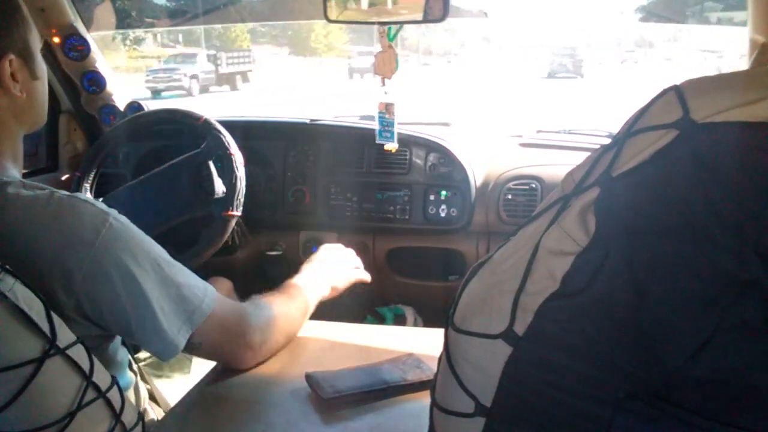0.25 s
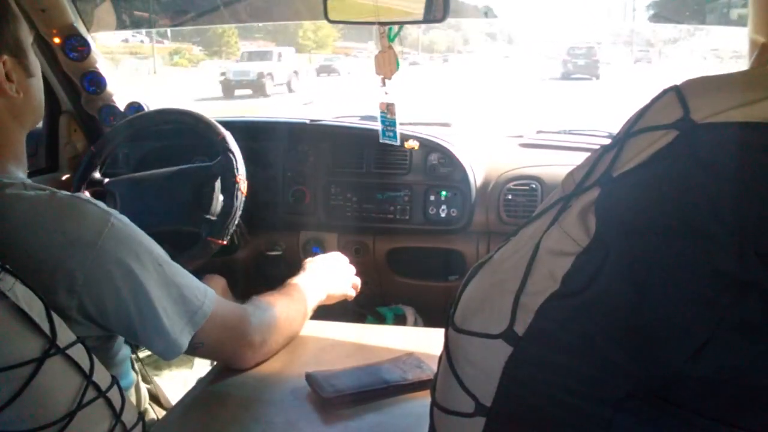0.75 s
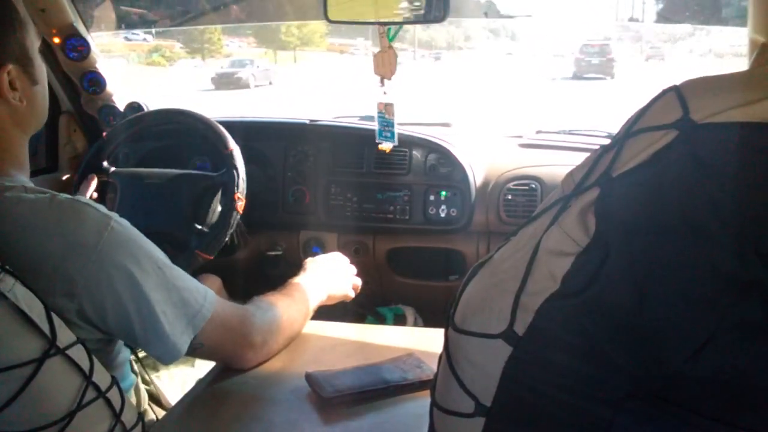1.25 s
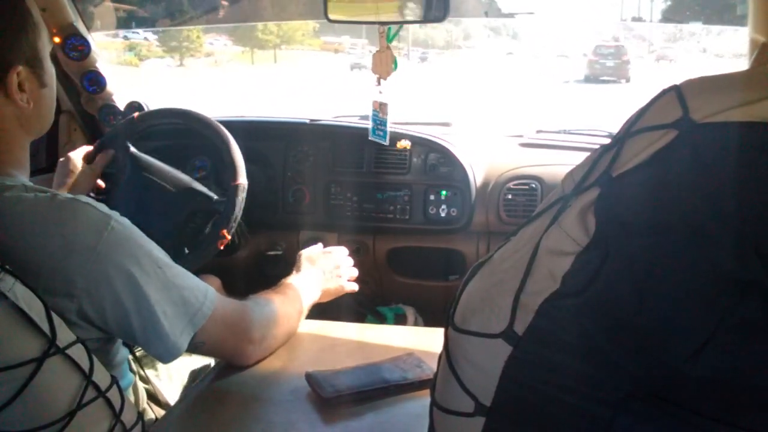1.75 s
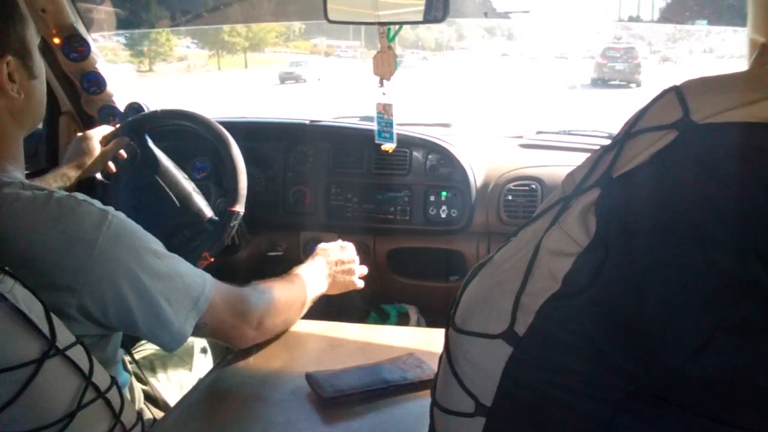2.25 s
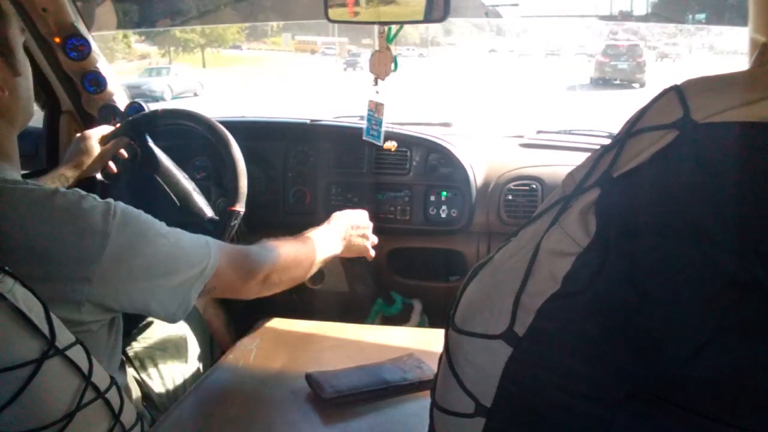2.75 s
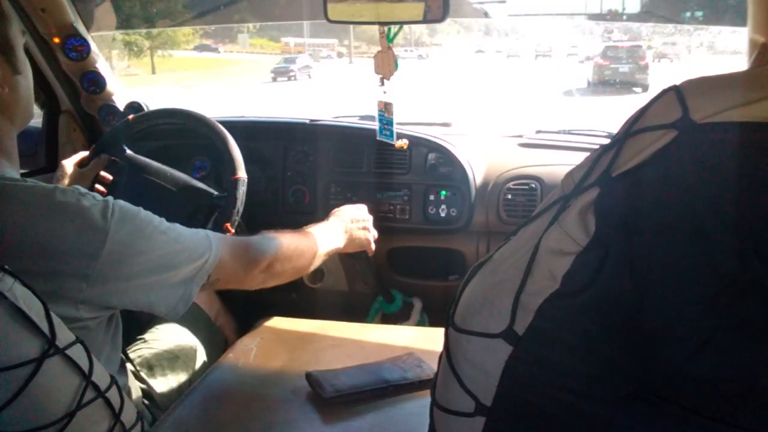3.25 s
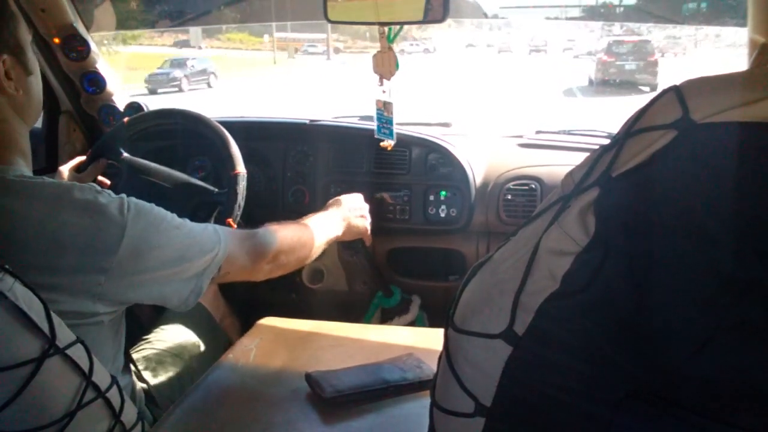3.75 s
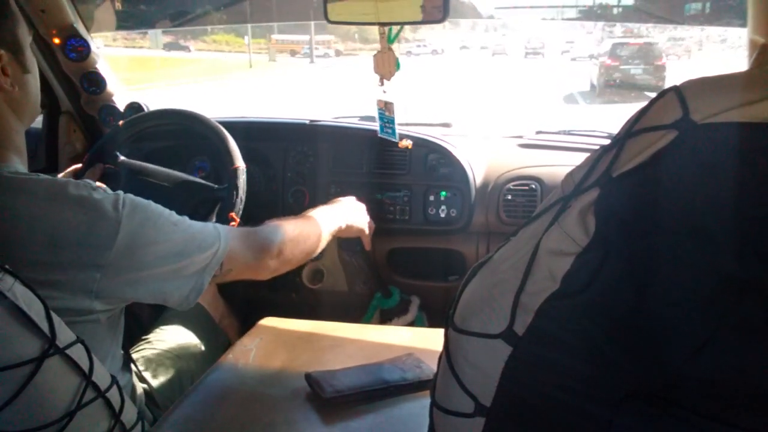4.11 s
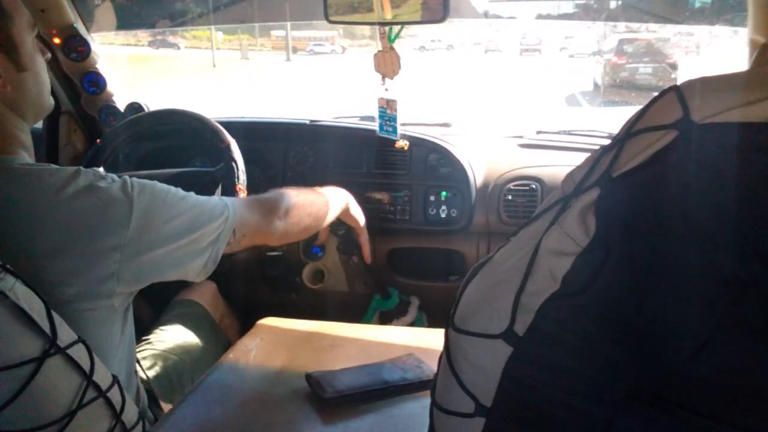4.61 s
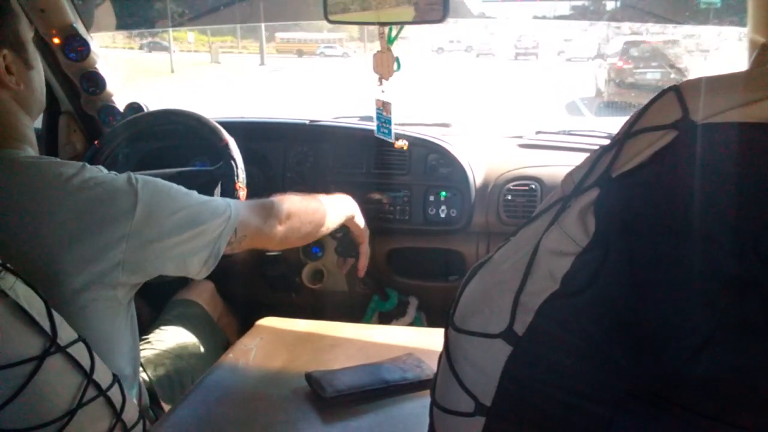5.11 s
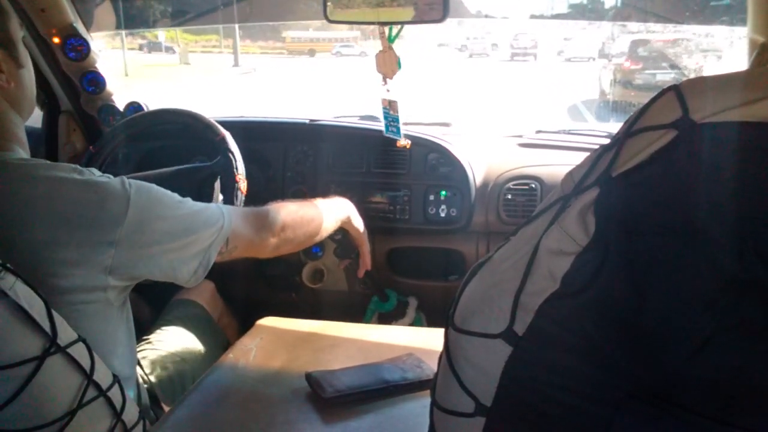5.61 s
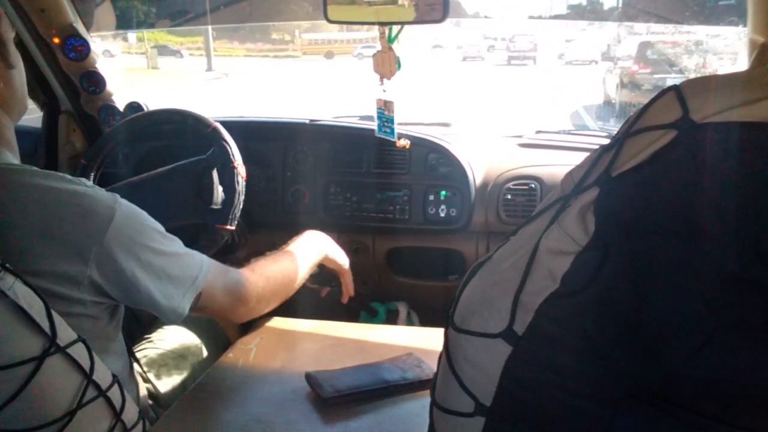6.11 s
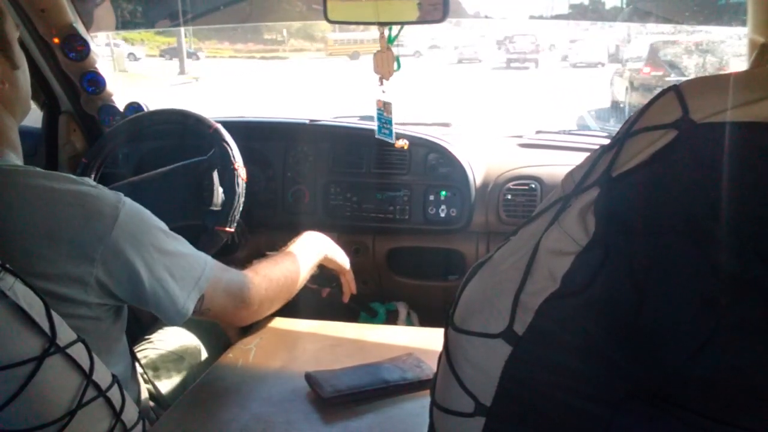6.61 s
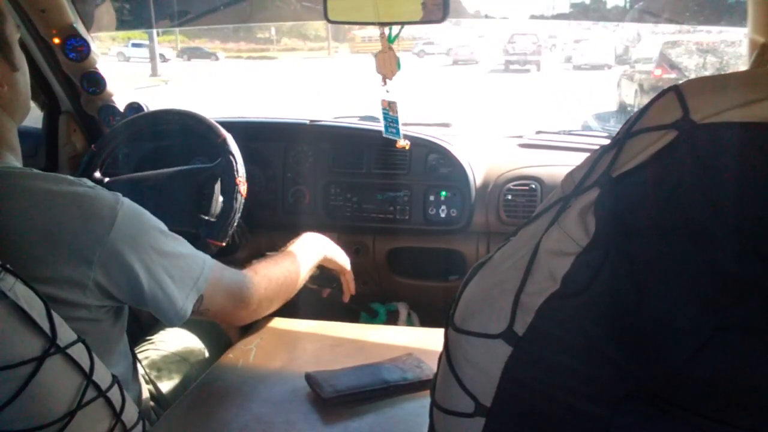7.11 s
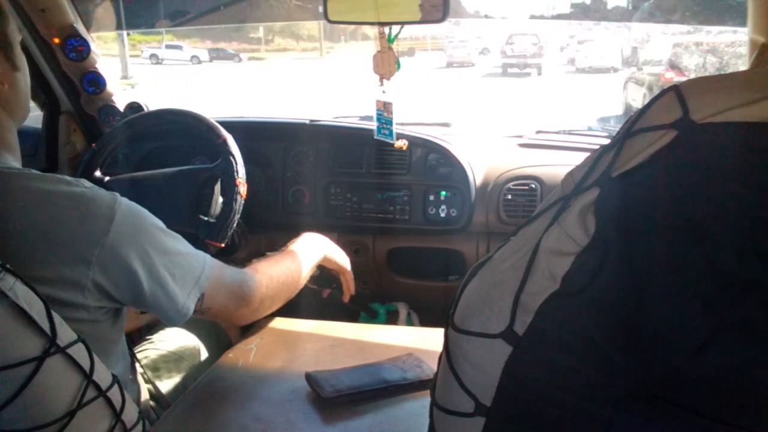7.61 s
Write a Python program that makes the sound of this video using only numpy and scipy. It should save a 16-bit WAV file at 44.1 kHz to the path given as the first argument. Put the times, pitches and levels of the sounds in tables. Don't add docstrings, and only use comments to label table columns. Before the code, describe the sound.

From 0 s, a moving diesel pickup cab is filled with bassy road roar, slight hiss and a throbbing tyre hum around 125 Hz, roughened by coarse patches and jolts. Engine tones and faint gear rattle sit beneath. A soft pedal rub swells from 0.2 to 0.6 s; dull trim knocks and light plastic ticks scatter until about 2.3 s, the strongest knock near 0.9. At 1.5 s the pedal slips with a loud, stuttering snap. A gentle press follows, with a thin, dry squeak from 2.15 to 2.67 s, strongest near 2.55. The engine then drops in pitch, reaching a steady clattering idle by 3.5 s; a sleeve slides near 2.8 and a last knock lands at 3.3. Tiny snaps come around 4.6 to 4.9 s. Keys and cloth rustle faintly until 7.3. The hum keeps gliding down below 50 Hz and the roar weakens, leaving idle clatter clearer at 7.86 s.

```python
import sys
import numpy as np
from scipy import signal
from scipy.fft import rfft, irfft
from scipy.io import wavfile
from scipy.ndimage import uniform_filter1d

SR = 44100
rng = np.random.default_rng(int(sys.argv[2]) if len(sys.argv) > 2 else 0)


def materialize(psi):
    bounded = np.clip(np.atleast_2d(psi).T, -1, 1)
    quanta = np.round(bounded * 32767).astype(np.int16)
    wavfile.write(sys.argv[1], SR, quanta)


def ratio(d):
    e = np.asarray(d, float) / 20
    return 10 ** e


N = 346626

# [t/s, tread pitch f/Hz]
SPEED = [(0, 127.5), (.6, 127.5), (1, 124.5), (1.6, 121), (2.8, 115.5), (3.3, 110), (3.9, 104), (4.7, 95),
         (5, 91), (5.25, 86), (5.6, 76.5), (5.95, 73.5), (6.4, 64.5), (6.85, 60), (7.45, 52), (7.86, 48.3)]
# [t/s, length/s, level/dB]
PATCHES = [(0.046, 0.15, 6.5), (0.261, 0.034, 11.5), (0.612, 0.16, 7.5), (0.891, .08, 11.5),
           (1.08, 0.044, 12), (1.287, .05, 4), (1.565, 0.16, 8), (1.894, 0.11, 7), (2.06, 0.055, 5),
           (0.432, .05, 1.5), (1.397, .06, 0.5), (4.503, .06, 1.5), (6.7, .05, 1), (2.252, 0.21, 5.5),
           (2.561, 0.079, 7.5), (2.766, 0.036, 13.5), (2.93, .07, 3), (3.282, .06, 3.5), (3.931, 0.11, 9),
           (4.278, 0.12, 7.5), (4.72, 0.074, 9), (4.983, 0.1, 4.5), (5.21, 0.1, 8.5), (5.629, 0.082, 10.5),
           (5.939, 0.13, 11), (6.474, 0.13, 7.5), (6.857, 0.16, 5), (7.408, 0.028, 12.5)]
# [t/s, level/dB]
JOLTS = [(0.219, 6.5), (.36, 6), (.52, 7), (1.2, 2), (2.32, 2), (2.761, 3), (3.26, 4), (4.24, 7),
         (4.7, 2.5), (4.99, 5), (5.5, 1), (5.91, -2), (6.06, 1), (6.42, -1), (6.85, 2), (7.14, 3),
         (7.35, 2)]
# [f/Hz, level/dB per Hz]
ROAR = [(24, -37), (40, -35), (65, -3.5), (91, 1), (209, -4.5), (377, -9.5), (449, -14), (912, -20),
        (1230, -21.5), (1750, -32.5), (2170, -34), (2800, -42.5), (3610, -45.5), (4400, -55), (5720, -87),
        (9680, -120)]
# [f/Hz, level/dB per Hz]
HISS = [(4700, -52.5), (5200, -55), (5500, -58.5), (8600, -59), (9100, -67), (13000, -65.5), (13600, -59.5),
        (15800, -52.5)]
# [f/Hz, likeness -1 to 1]
LIKENESS = [(60, 0.76), (99, 0.96), (160, 0.83), (270, 0.72), (450, 0.86), (740, 0.073), (1220, -0.62),
            (2010, 0.22), (3330, -0.13), (5500, -0.071), (9080, -0.04), (15000, -0.5)]
# [f/Hz, left minus right level/dB]
LEAN = [(60, -1), (180, -2.5), (550, -5.5), (1650, -1.5), (4970, -1.5), (15000, 2.5)]
# [multiple of tread pitch, level/dB at full speed]
TREAD_TOP = [(3, -36.5), (4, -38.5), (5, -44)]
# [f/Hz, level/dB]
BOOM = [(50, 3.5), (80, -7), (97, 3.5), (110, 0), (120, 5), (150, 0.5), (200, -2.5), (240, -4.5)]

# [t/s, firings per second f/Hz, share in gear 0-1]
ENGINE = [
    (0, 57.6, 1),
    (1.2, 55.4, 1),
    (2.4, 53, 1),
    (2.7, 47, .5),
    (3.1, 38.5, 0),
    (3.5, 37.25, 0),
    (7.86, 37.25, 0),
]
# [crank order in thirds of the firing rate, level/dB in gear, level/dB at idle]
ORDERS = [(3, -30, -50), (6, -42, -39), (9, -36, -45), (12, -38, -43), (15, -48, -42), (16, -55, -40),
          (18, -46, -39), (21, -48, -44), (24, -48, -36.5), (27, -50, -45), (33, -52, -48),
          (36, -52, -42.5)]
# [f/Hz, width/Hz, level/dB]
BLOCK = [(500, 133, -41.5), (730, 540, -53.5), (1210, 360, -48.5), (2020, 200, -60.5), (4940, 130, -85)]
# [f/Hz, width/Hz, level/dB in gear]
GEARBOX = [(1410, 120, -52), (2980, 390, -58), (3800, 370, -70.5)]
# [f/Hz, width/Hz, level/dB at idle]
INJECTOR = [(1890, 94, -56), (3350, 250, -71), (3540, 58, -67)]

# [t/s, level/dB]
RUSTLES = [(.908, -48), (1.118, -50.5), (1.225, -54), (1.278, -48), (1.3605, -51), (1.807, -50),
           (2.1126, -46.5), (3.5, -47), (3.908, -53), (4.0228, -51), (4.413, -51), (4.7968, -50),
           (4.836, -52), (4.869, -49), (5.295, -47.5), (5.3294, -43.5), (5.4087, -51), (5.4796, -52),
           (5.6325, -52), (5.7648, -45), (5.815, -46), (6.045, -51), (6.144, -48), (6.3619, -54),
           (6.5565, -48), (6.6233, -50.5), (6.71, -52), (6.793, -52), (6.854, -45), (7.1535, -50),
           (0.077, -49), (.735, -46.5), (1.066, -49), (1.383, -47), (1.7486, -60), (1.988, -45.5),
        (3.214, -49), (3.794, -49), (3.954, -44.5), (4.3594, -51), (4.765, -46), (5.235, -47.5),
        (5.355, -49), (5.385, -49), (5.6955, -55), (6.0, -56), (6.2034, -47), (6.9082, -47), (7.206, -48),
        (7.3407, -54)]
# [t/s, level/dB, length/s, left minus right level/dB]
SLEEVE = [
    (2.722, -54.5, 0.23, -5),
    (2.881, -56, 0.31, -3),
]
# [f/Hz, level/dB per Hz]
CLOTH = [(2500, 7.5), (4500, 4), (6000, -2.5), (8600, 2), (9200, -6.5), (13000, -5), (13700, 3),
         (15800, -11)]
# [t/s, level/dB, f/Hz, upper ring level/dB, left minus right level/dB]
KNOCKS = [
    (.161, -32, 530, -8, -3.5),
    (.507, -30, 560, -8, -5),
    (.666, -30, 665, -8, -2.5),
    (0.904, -24, 520, -8, -5),
    (1.16, -27, 525, -7, -9),
    (1.314, -25.5, 560, -3, -7),
    (1.322, -33, 560, -8, -7),
    (1.87, -30.5, 624, -3, -3),
    (3.271, -29, 696.7, -6, -3),
]
# [t/s, level/dB, f/Hz, upper ring level/dB, left minus right level/dB]
TICKS = [(0.5814, -36, 2400, -16, 8), (0.6051, -39, 2400, -18, -5), (0.6432, -40.5, 2520, -4, -5),
         (0.956, -32, 2460, -10, 2), (0.9618, -32, 2401, -20, -7), (1.092, -33, 2400, -14, -3),
         (1.1147, -40, 2470, -7, 4), (1.236, -41, 2440, -20, -6), (1.3898, -36.5, 2455, -13, 1),
         (1.7684, -33.5, 2370, -15, 3), (1.8163, -47, 2334, -21.5, 0), (2.059, -35, 2430, -19, 1),
         (2.1001, -39, 2420, -11, -6), (2.2423, -44, 2400, -10, 2), (2.275, -38, 2420, -18, -3),
         (2.8167, -38, 2050, -7, 3), (3.1946, -41, 2250, -15, 7), (4.657, -41, 2000, -16, -5),
         (5.0653, -41, 2390, -16, 6)]
# [t/s, level/dB, f/Hz, upper ring level/dB, left minus right level/dB]
SNAPS = [
    (4.6424, -49, 3000, -20, 6),
    (4.655, -48, 3350, -22, 6),
    (4.665, -49, 3300, -20, 6),
    (4.88, -40.5, 4320, -15, 9),
    (4.8805, -47, 2400, -5, 6),
    (1.5168, -28, 4900, -9, -1),
]

# [t/s, rise/s, hold/s, fall/s, level/dB]
STROKES = [
    [(0.16, 0.293, 0.082, 0.078, -40)],
    [(1.503, 0.0059, 0.0086, 0.014, -28), (1.51, 0.013, .035, .045, -33.5)],
    [(2.13, 0.073, 0.38, 0.055, -55.5), (2.38, 0.22, 0.06, 0.028, -48)],
]
# [f/Hz, level/dB per Hz]
RUBS = [
    [(760, -34.5), (1300, -17.5), (1600, 2), (2100, -3.5), (2760, 1.5), (3440, -4.5), (4060, -5),
     (4900, -8), (5400, -14), (6040, -12.5), (8350, -11.5), (10300, -24), (12800, -13), (15800, -17.5)],
    [(1100, -43), (1400, -3.5), (2300, -5), (2800, -4), (3100, -10.5), (5000, -13), (5600, -17),
     (8300, -15), (9500, -24.5), (13000, -22.5), (15800, -18)],
    [(1060, -41), (1800, 2), (2360, -8), (2450, -11), (3160, -2.5), (3460, -11.5), (3860, -10), (5030, -16),
     (6140, -6), (6910, -17), (8340, -7.5), (9160, -24), (11000, -18.5), (12400, -16), (13300, -27),
     (15800, -23)],
]
# [f/Hz, width/Hz, level/dB]
PEDAL_ARM = [(1580, 50, -12), (2200, 50, -14), (2830, 60, -8), (3200, 45, -10), (3910, 70, 2),
             (4180, 55, 1), (4500, 70, -2), (4790, 70, 5), (5100, 60, -6)]
# [t/s, level/dB, f/Hz, length/s]
SLIPS = [
    (1.5068, -13, 1640, .003),
    (1.5142, -13.5, 1600, .0026),
    (1.521, -21, 2250, .003),
    (1.5305, -25, 1600, .003),
    (1.5395, -16, 1620, .0045),
    (1.5582, -18, 1640, .003),
    (1.5665, -26, 1700, .004),
    (1.574, -28, 1620, .004),
]
# [t/s, level/dB]
PRESSURE = [
    (2.15, -12),
    (2.32, -6),
    (2.41, -5),
    (2.46, 0),
    (2.51, 2),
    (2.56, 4.5),
    (2.6, -5),
    (2.67, -6),
]
# [t/s, slips per second f/Hz]
SLIP_RATE = [
    (2.17, 388),
    (2.27, 385),
    (2.35, 388),
    (2.4, 385),
    (2.47, 388.5),
    (2.515, 380),
    (2.54, 382.5),
    (2.58, 387.5),
    (2.67, 389),
]
# [multiple of the slip rate, level/dB]
SQUEAK_TONES = [(2, 6), (4, 10), (5, 2), (6, -4), (7, -10), (8, 6), (9, 0), (10, -1), (11, -7), (12, -2),
                (13, -13), (14, -6), (15, -10), (16, -8), (17, -17), (18, -15), (19, -14), (20, -11),
                (21, -12), (22, -12), (24, -22), (25, -22), (28, -26), (30, -24), (31, -24), (32, -17.5)]
# [start t/s, end t/s, f/Hz, level/dB]
WHISTLES = [(1.95, 2.06, 5200, -72), (1.96, 2.12, 5900, -67), (2.03, 2.11, 9200, -71.5),
            (1.98, 2.1, 8000, -74), (2.0, 2.09, 9100, -73), (2.49, 2.6, 2100, -52), (2.49, 2.58, 2290, -57),
            (2.57, 2.67, 3712, -53), (2.55, 2.67, 6200, -58), (2.57, 2.67, 6340, -59),
            (2.57, 2.67, 1800, -49), (2.5, 2.58, 4190, -58), (2.59, 2.67, 3300, -61)]


def evened(x):
    return x / np.sqrt(np.mean(x ** 2) + 1e-20)


def read(points, hz):
    f, value = np.transpose(points)
    return np.interp(np.log(hz + 1), np.log(f + 1), value)


def columns(rows, t):
    s, *cols = np.transpose(rows)
    return [np.interp(t, s, c) for c in cols]


def add(mix, s, sound):
    part = mix[..., round(s * SR):][..., :sound.shape[-1]]
    part += sound[..., :part.shape[-1]]


def sides(pan_db):
    return ratio([[pan_db / 2], [-pan_db / 2]])


def resonate(x, hz, width):
    turn = np.exp(2j * np.pi * np.cumsum(hz * np.ones(len(x))) / SR)
    r = np.exp(-np.pi * width / SR)
    return 2 * (turn * signal.lfilter([1 - r], [1, -r], x / turn)).real


def coloured(points, same, streak_db=0):
    hz = np.fft.rfftfreq(N, 1 / SR)
    a, b = rfft(rng.standard_normal((2, N)))
    streaks = np.interp(hz, np.linspace(0, SR / 2, 340), rng.standard_normal(340))
    shape = ratio(read(points, hz) + streak_db * streaks) * (hz > points[0][0])
    ears = np.array([a, same * a + np.sqrt(1 - same ** 2) * b])
    return evened(irfft(ears * shape, N))


def wander(count=14):
    return evened(np.interp(np.arange(N), np.linspace(0, N, count), rng.standard_normal(count)))


def cab(x, wet_db=-4):
    u = np.arange(3000) / SR
    tail = rng.standard_normal((2, 3000)) * ratio(-60 * u / 0.077) * (u > .002)
    tail /= np.linalg.norm(tail[0])
    return x + ratio(wet_db) * signal.oaconvolve(x, tail, axes=1)[:, :N]


def drive(t):
    hz = columns(SPEED, t)[0]
    coarse_db = sum(db * np.exp(-((t - s) / length) ** 2) for s, length, db in PATCHES)
    return hz, np.log10(hz / 125), coarse_db


def road():
    frames, hz = N // 256 + 5, np.fft.rfftfreq(2048, 1 / SR)
    t = np.arange(frames) * 256 / SR
    a, b, c, d, blotches = rng.standard_normal((frames, 1025, 5)).T
    blotches = evened(uniform_filter1d(uniform_filter1d(blotches, 14, 0), 12, 1))
    same = np.clip(read(LIKENESS, hz), -1, 1)[:, None]
    left = a + 1j * b
    ears = np.array([left, same * left + np.sqrt(1 - same ** 2) * (c + 1j * d)])

    _, slower, coarse_db = drive(t)
    jolt_s = 0.094
    shake_db = 1.5 * slower + sum(db * np.exp(-((t - s) / jolt_s) ** 2) for s, db in JOLTS)
    roar_db = 22.2 * slower + 0.044 * coarse_db
    hiss_db = 6.2 * slower
    swings_db = [v - v.mean() for v in (shake_db, roar_db, hiss_db, 0.37 * hiss_db)]

    centres = np.log([80, 350, 1600, 7000])
    weights = [np.interp(np.log(hz + 1), centres, row) for row in np.eye(4)]
    level_db = sum(np.outer(w, v) for w, v in zip(weights, swings_db))
    level_db = level_db + read(ROAR[:-2] + HISS, hz)[:, None] + 0.85 * blotches
    lean_db = np.multiply.outer([.5, -.5], read(LEAN, hz))[..., None]
    ears *= ratio(level_db + lean_db)
    return ratio(-24) * evened(signal.istft(ears, nperseg=2048, noverlap=1792)[1][:, :N])


def tread(t):
    hz, slower, coarse_db = drive(t)
    turns = np.cumsum(hz) / SR
    tone_db = -30.5 + 22 * slower + coarse_db + read(BOOM, hz)
    octave_db = -37 - 2.7 * slower + coarse_db + read(BOOM, 2 * hz)
    rows = [(1, tone_db, .35), (2, octave_db, .5)]  # multiple, dB, share of fuzz
    rows += [(k, db + 30 * slower, .8) for k, db in TREAD_TOP]
    out = np.zeros(N)
    for k, db, fuzz in rows:
        throb = 1 + .55 * np.cos(2 * np.pi * (turns / 9.5 + rng.random()))
        width = 12 * k
        skirt = resonate(rng.standard_normal(N), k * hz, width)
        skirt = evened(resonate(skirt, k * hz, width))
        tone = evened(throb * np.cos(2 * np.pi * (k * turns + rng.random())))
        out += ratio(db) * (np.sqrt(1 - fuzz ** 2) * tone + fuzz * skirt)
    return out


def engine(t):
    rate, gear = columns(ENGINE, t)
    unsteady = 1 + 0.00231 * evened(resonate(rng.standard_normal(N), 0, 1.46))
    fires = np.cumsum(rate * unsteady) / SR
    tones = np.zeros(N)
    for k, gear_db, idle_db in ORDERS:
        db = gear * gear_db + (1 - gear) * idle_db + 1.2 * wander()
        tones += ratio(db) * np.cos(2 * np.pi * (k * fires / 3 + rng.random()))

    strength = ratio(1.5 * rng.standard_normal(500))[fires.astype(int)]
    knock = strength * np.exp(-(fires % 1) / .4) * rng.standard_normal((2, N))

    def ringing(rows):
        out = np.zeros((2, N))
        for f, width, db in rows:
            ring = [resonate(resonate(ear, f, width), f, width) for ear in knock]
            out += ratio(db) * evened(np.array(ring))
        return out

    clatter = ringing(BLOCK) + ringing(GEARBOX) * gear + ringing(INJECTOR) * ratio(-9 * gear)
    return tones, clatter


def rustles():
    puffs = np.zeros((2, N))
    rows = [(s, db, .025, -4.5) for s, db in RUSTLES]
    for s, db, length, pan_db in rows + SLEEVE:
        v = np.arange(0, 2.5, 1 / (length * SR))
        swell = np.minimum(4 * v, 1) * np.exp(-v ** 3)
        add(puffs, s - .002, ratio(db - 10) * sides(pan_db) * swell)
    grain = ratio(3 * evened(uniform_filter1d(rng.standard_normal(N), 90)))
    return puffs * grain * coloured(CLOTH, 0.24)


def ticks():
    out, u = np.zeros((2, N)), np.arange(900) / SR
    for s, db, f, upper_db, pan_db in TICKS + SNAPS + KNOCKS:
        ring = np.sin(2 * np.pi * f * u)
        ring += ratio(upper_db) * np.sin(2 * np.pi * 1.44 * f * u)
        ring += ratio(-0.5) * np.sin(2 * np.pi * 0.56 * f * u)
        ring *= ratio(db + 5 - 60 * u * f / 34) * np.minimum(u * f / 1.2, 1)
        click = uniform_filter1d(uniform_filter1d(rng.standard_normal(40), 5), 3)
        ring[20:60] += ratio(db - 15) * min(f / 2400, 1) ** 2 * np.hanning(40) * click
        add(out, s - .001, ring * sides(pan_db))
    return out


def push(t, start, rise, hold, fall, db):
    up = np.clip(1 - (t - start) / rise, 0, 1)
    down = np.clip((t - start - rise - hold) / fall, 0, 1)
    return (up < 1) * (down < 1) * ratio(db - 33 * (up ** 2 + down ** 2))


def pedal(t):
    out = np.zeros((2, N))
    ring_shares, streaks_db = (1.2, .02, .2), (2, 1, 2.5)
    for pushes, rub, ring_share, streak_db in zip(STROKES, RUBS, ring_shares, streaks_db):
        noise = coloured(rub, .1, streak_db)
        arm = np.zeros((2, N))
        for f, width, db in PEDAL_ARM:
            ring = [resonate(ear, f * (1 + .004 * wander(90)), width) for ear in noise]
            arm += ratio(db) * np.array(ring)
        force = sum(push(t, *row) for row in pushes)
        flicker = ratio(1 * wander(900))
        out += force * flicker * evened(noise + ring_share * evened(arm))
    out = cab(out) * sides(-1.6)
    ear_db, lag = np.array([[-1.2], [.8]]), np.array([[0], [1.9]])
    for s, db, f, length in SLIPS:
        u = np.arange(0, 2.5, 1 / (length * SR))
        jerk = 2.3 * u * np.exp(-u ** 2) * np.sin(2 * np.pi * f * length * u + lag)
        add(out, s, ratio(db + ear_db) * jerk)
    return out


def squeak(t):
    hz = columns(SLIP_RATE, t)[0]
    press_db = columns(PRESSURE, t)[0]
    low_stop = np.clip((t - 2.58) / .04, 0, 1)
    low_db = -53.5 - 0.026 * press_db - 12 * low_stop
    high_db = -54 + press_db
    pressed = (t > PRESSURE[0][0]) & (t < PRESSURE[-1][0])
    on = uniform_filter1d(1. * pressed, 800)
    out = np.zeros((2, N))
    for k, db in SQUEAK_TONES:
        fuzz = evened(resonate(rng.standard_normal(N), k * hz, 0.94 * k))
        flutter_db = (.5 + .13 * k) * wander(140)
        lag = np.array([[0], [1.3 + .5 * np.sin(k)]])
        tone = np.cos(2 * np.pi * k * np.cumsum(hz) / SR + lag) + .25 * fuzz
        out += on * ratio((low_db if k < 7 else high_db) + db + flutter_db) * tone
    for start, end, f, db in WHISTLES:
        count = round((end - start) * SR)
        whistle = evened(resonate(rng.standard_normal(9000), f, 40))[:count]
        add(out, start, ratio(db) * np.hanning(count) * whistle)
    return out


def scene():
    t = np.arange(N) / SR
    roar = road()
    hum = tread(t)
    tones, clatter = engine(t)
    hum = hum + tones
    late = np.pad(hum, (14, 0), "edge")[:N]
    hum = np.array([late, hum]) * ratio([[-1.1], [1]])
    return roar + hum + clatter + cab(rustles() + ticks(), wet_db=-9) + pedal(t) + squeak(t)


def low_pass(x):
    return signal.sosfilt(signal.butter(12, 15830, fs=SR, output="sos"), x)


def record(dry):
    x = np.pad(dry, ((0, 0), (511, 511)), "reflect")
    x = signal.sosfilt(signal.butter(3, 52, "high", fs=SR, output="sos"), x)
    x = 1.5 * np.tanh(x / 1.5)
    top = signal.firwin(1023, 15830, window=("kaiser", 10), fs=SR)
    x = signal.oaconvolve(x, top[None], "valid")
    x *= np.minimum(np.arange(N, 0, -1) / 150, 1)
    return low_pass(x)


dry = scene()
out = record(dry)
materialize(out)
```